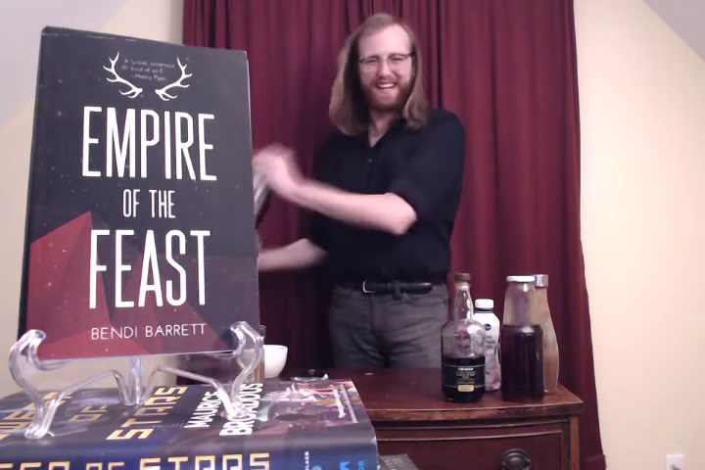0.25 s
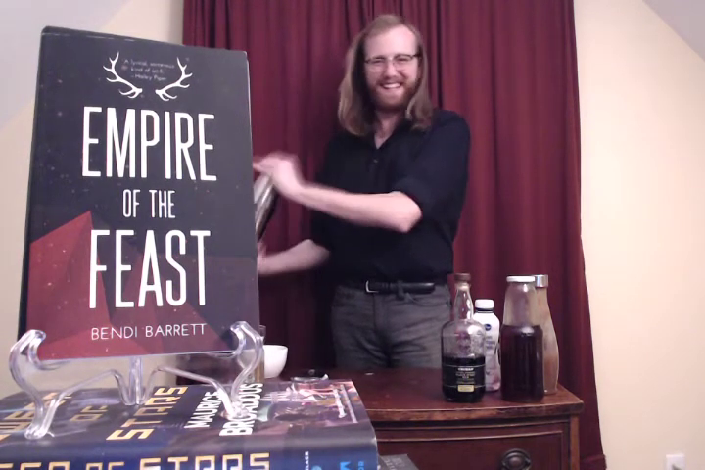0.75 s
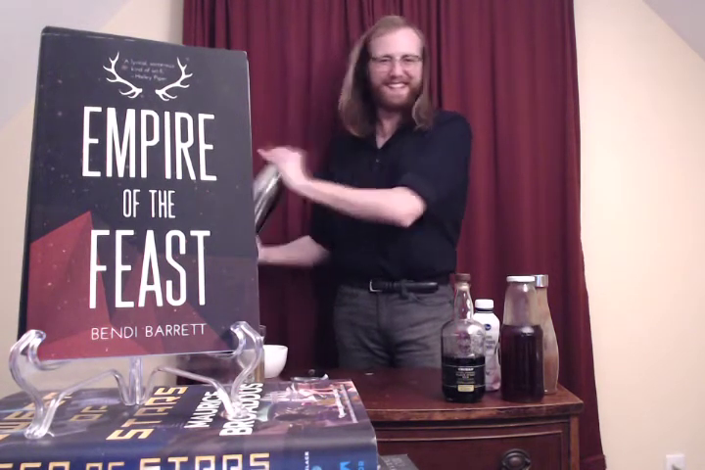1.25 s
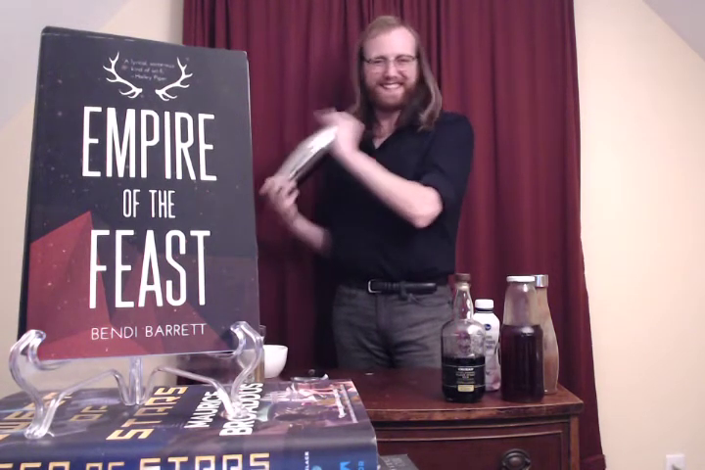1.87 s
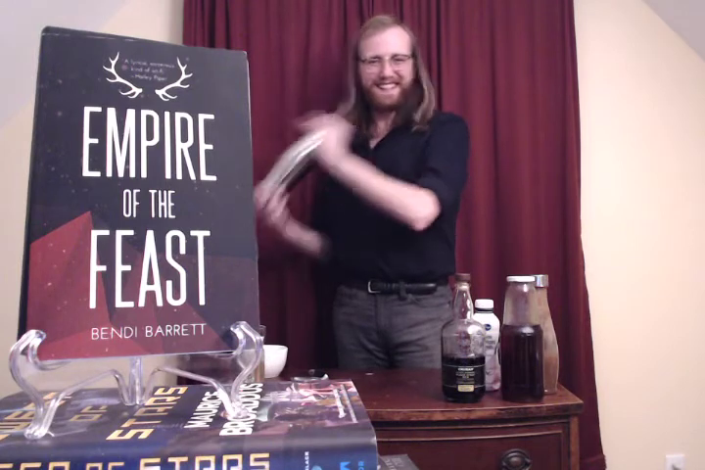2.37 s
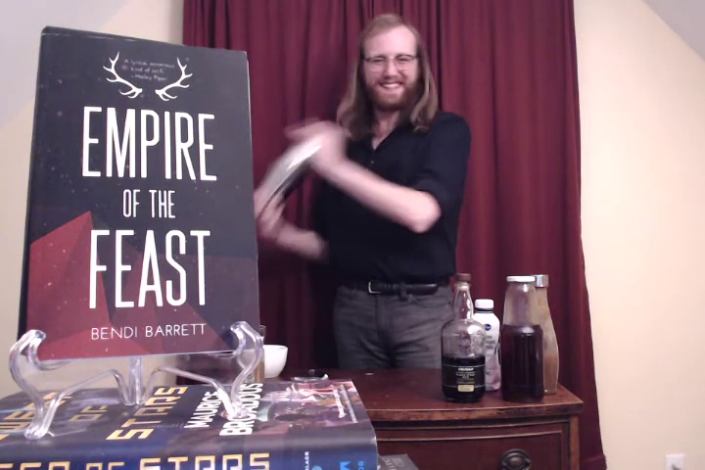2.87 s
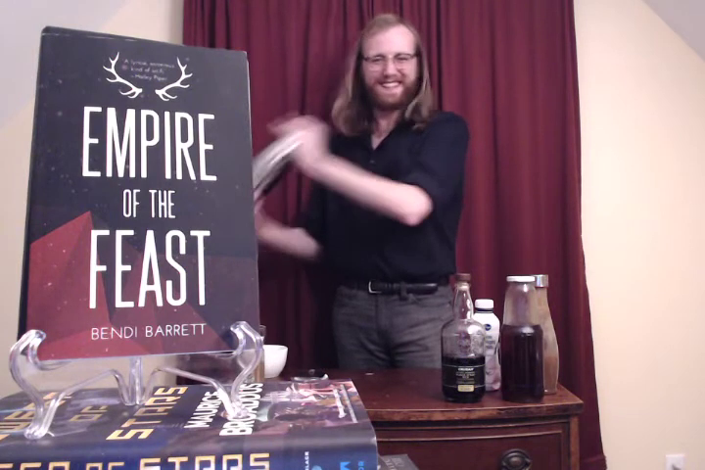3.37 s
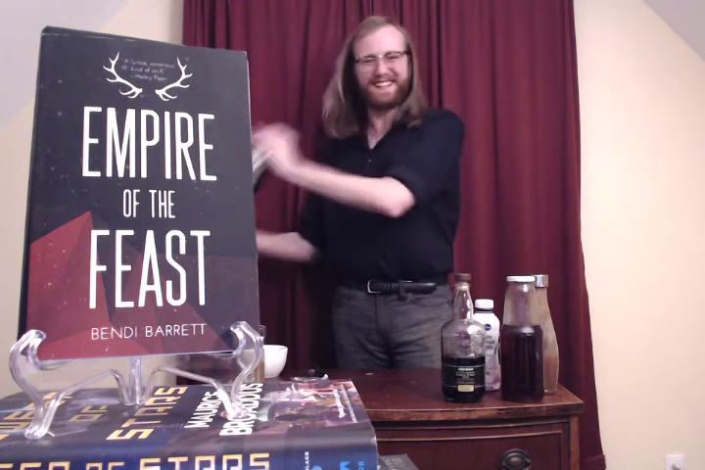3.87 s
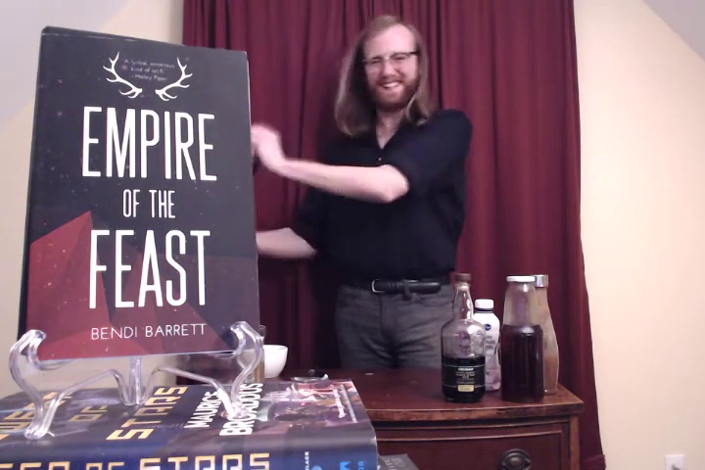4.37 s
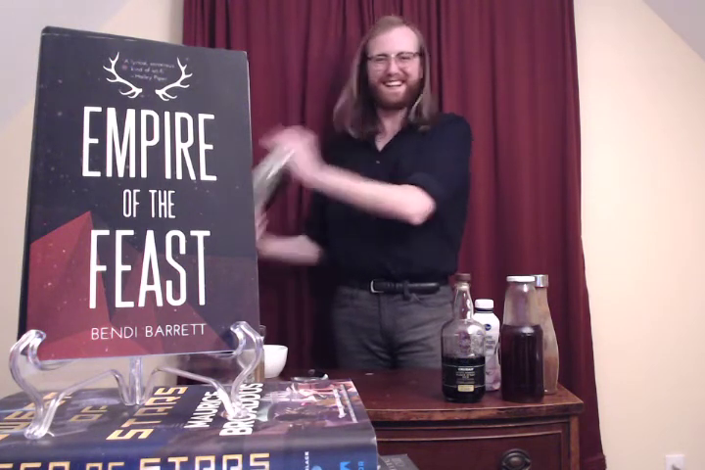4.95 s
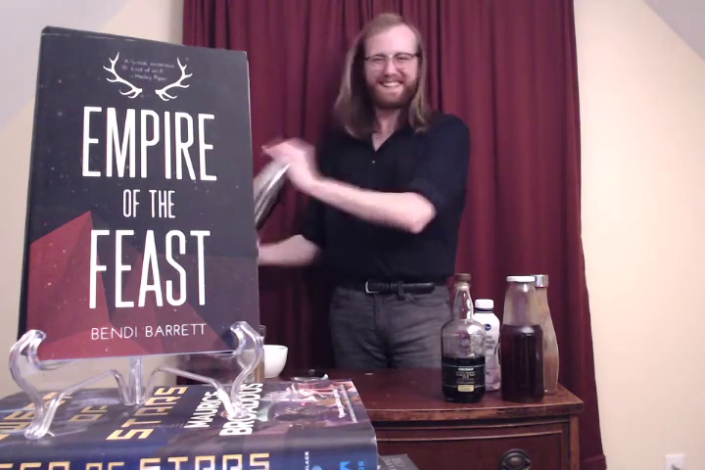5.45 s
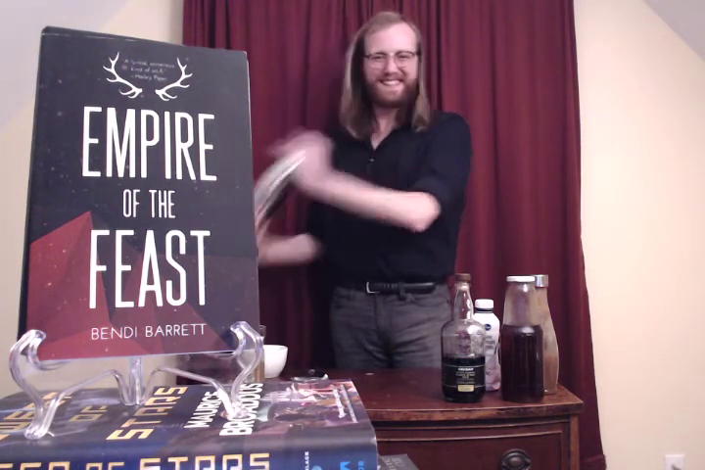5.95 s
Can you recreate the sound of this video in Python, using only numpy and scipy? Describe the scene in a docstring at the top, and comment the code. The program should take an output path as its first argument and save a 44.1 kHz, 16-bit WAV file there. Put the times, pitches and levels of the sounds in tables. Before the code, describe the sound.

A metal shaker full of ice rattles rapidly without pause, nearly eight strokes a second, with sharp cracks, clinks and fine sloshing.

```python
"""Cocktail shaker, hard shake

Ice and liquid are shaken hard in a steel cocktail shaker, nearly eight strokes a second, in a small curtained room.
On each stroke the cubes skitter along the wall as random taps, then crash into the end and ring the tin's modes.
Single cubes crack as noise bursts and clink as damped notes; low thuds mark the load landing flat on the base.
The drink sloshes between the strokes as fine, fading collisions, over faint filtered noise for the room's air."""
import sys
import numpy as np
from scipy import signal
from scipy.fft import rfft, irfft
from scipy.io import wavfile
from scipy.ndimage import uniform_filter1d

SR = 44100
rng = np.random.default_rng(int(sys.argv[2]) if len(sys.argv) > 2 else 0)


def transcribe(u):
    """Save the signal u as a 16-bit wav file named by the first command-line argument.

    u: samples, shape (n,) or (channels, n), limited to [-1, 1]; the rate is SR.
    q: integer samples, one column per channel.
    """
    v = np.clip(np.atleast_2d(u).T, -1, 1)
    q = np.round(v * 32767).astype(np.int16)
    wavfile.write(sys.argv[1], SR, q)


N = 273593
STROKE_SIZE = 13230  # samples in one stroke's sound, 0.3 s


def undb(db):
    """Decibels to gain."""
    return 10 ** (np.asarray(db) / 20)


def add(out, start_s, x):
    """Mix x into out from the given time on, dropping what falls outside."""
    start = int(start_s * SR)
    x = x[max(-start, 0):max(len(out) - start, 0)]
    first = max(start, 0)
    out[first:first + len(x)] += x


def unit(x):
    """Scale to an energy of one."""
    return x / np.sqrt(np.sum(x ** 2) + 1e-18)


def through(x, response):
    """Convolve and keep the length."""
    return signal.fftconvolve(x, response)[:len(x)]


def colour(points, size=4096):
    """Causal, minimum-phase impulse response of a (pitch_hz, level_db) spectrum."""
    hz, db = np.transpose(points)
    grid = np.maximum(np.arange(size // 2 + 1) * SR / size, 1)
    spectrum_db = np.interp(np.log(grid), np.log(hz), db)
    cepstrum = irfft(np.log(undb(spectrum_db)))
    # folding the cepstrum forward in time makes the response causal
    cepstrum[1:size // 2] *= 2
    cepstrum[size // 2 + 1:] = 0
    return irfft(np.exp(rfft(cepstrum)))


def mode(hz, t60):
    """A sine that fades by 60 dB in t60 seconds."""
    t = np.arange(STROKE_SIZE) / SR
    return np.sin(2 * np.pi * hz * t) * np.exp(-np.log(1000) * t / t60)


# spectrum of the room's still air: pitch_hz [Hz], level_db [dB, relative]
AIR_SPECTRUM = [(15, 3), (25, -1), (42, -11), (90, -12.5), (200, -17), (1000, -8), (15000, -40)]
AIR_DB = -51.5  # RMS level


def room_air():
    """Steady noise, heaviest in the lows, for the still air of the room."""
    return undb(AIR_DB) * through(rng.standard_normal(N), unit(colour(AIR_SPECTRUM)))


ROOM_DB, ROOM_T60_S = 1, 0.12  # tail against direct sound for the hits; decay time


def room(x, wet_db):
    """Direct sound and a diffuse tail; the moving shaker keeps the echoes from settling into a pattern."""
    t = np.arange(STROKE_SIZE) / SR
    fade = unit(np.exp(-np.log(1000) * t / ROOM_T60_S))
    tail_power = np.abs(through(x ** 2, fade ** 2))
    tail = rng.standard_normal(len(x)) * np.sqrt(tail_power)
    return (x + undb(wet_db) * tail) / np.sqrt(1 + undb(2 * wet_db))


# colour of ice on wet steel: pitch_hz [Hz], level_db [dB, relative]
ICE_COLOUR = [(40, -27), (100, -21), (155, -17.5), (200, -7.5), (420, -7), (560, -5.5), (1300, 1.5),
              (1680, -3.5), (2200, 1.5), (3600, -1), (7600, 1), (9400, -5), (11600, -7), (15500, -16)]
# broad resonances of the filled shaker: pitch_hz [Hz], width_hz [Hz], level_db [dB over the plain rattle]
BODY_RESONANCES = [(200, 24, -3.5), (282, 20, -5.5), (358, 31, -8), (460, 14, -38), (565, 99, 2.5),
                   (733, 45, 2), (927, 23, -0.5), (1027, 140, -3.5), (1470, 290, -7.5), (1925, 450, -4.5),
                   (2660, 57, -22), (2817, 240, 0.5), (3064, 33, 2), (4370, 390, -1)]


def shaker_body():
    """Response of the filled shaker to one tap of ice: the tap plus the resonances it excites."""
    tap = colour(ICE_COLOUR)
    response = tap.copy()
    for hz, width_hz, level_db in BODY_RESONANCES:
        b, a = signal.iirpeak(hz, hz / width_hz, fs=SR)
        response += undb(level_db) * signal.lfilter(b, a, tap)
    return unit(response)


def tone(x, bass_db, treble_db):
    """A flat landing of the whole load is fuller; glancing corners are brighter."""
    curve = [(90, 0), (190, bass_db), (480, bass_db), (950, 0), (3500, 0), (7000, treble_db)]
    return through(x, colour(curve))


def collisions(size, rate, spread_db, even_s):
    """Random clicks (rate per s), many small and a few large, with a power of about one over even_s."""
    sizes = undb(spread_db * np.minimum(rng.exponential(size=size), 2 * np.pi))
    x = (rng.random(size) < rate / SR) * rng.choice([-1, 1], size) * sizes
    power = np.abs(uniform_filter1d(x ** 2, int(even_s * SR) + 1))
    return x / np.sqrt(power + 1e-9)


SLOSH_DB, SLOSH_SETTLE_DB_PER_S = -33, 56  # level before shaker tone; fade after each crash


def slosh(body):
    """Each crash stirs up froth and loose chips, which settle until the next one."""
    t = np.arange(N) / SR
    crashes = np.array(STROKES)[:, 1]
    latest = np.maximum(np.searchsorted(crashes, t) - 1, 0)
    since_crash = t - crashes[latest]
    chips = room(collisions(N, rate=1800, spread_db=3.2, even_s=.03), wet_db=4)
    wet_rattle = through(tone(chips, bass_db=-3.5, treble_db=-1.5), body)
    return undb(SLOSH_DB - SLOSH_SETTLE_DB_PER_S * since_crash) * wet_rattle


THUD_SWELL_S = 0.0035


def thud(hz):
    """The whole load lands flat on the base: a low, quickly damped push."""
    t = np.arange(STROKE_SIZE) / SR
    return mode(hz, t60=0.027) * (1 - np.exp(-t / THUD_SWELL_S))


# flat landings on the base: start_s [s], pitch_hz [Hz], level_db [dB, before swell and fade]
THUDS = [(0.235, 215, -17), (0.364, 280, -11.5), (0.468, 240, -31), (2.026, 160, -25), (2.438, 240, -16),
         (4.929, 180, -27)]


def thuds():
    """Occasional low thuds of the load against the base."""
    out = np.zeros(N)
    for start_s, pitch_hz, level_db in THUDS:
        add(out, start_s, undb(level_db) * thud(pitch_hz))
    return out


def clink(hz):
    """A quickly damped note that swells for a moment as the cube chatters on the wall."""
    t = np.arange(STROKE_SIZE) / SR
    return mode(hz, t60=.08) * (1 - np.exp(-t / .0015))


# blows that leave a short note: start_s [s], pitch_hz [Hz], level_db [dB, before swell and fade]
CLINKS = [(0.135, 1335, -17), (0.138, 2060, -11), (0.236, 4650, -14), (1.423, 2239, -18),
          (1.924, 2067, -12), (2.452, 1378, -15), (2.692, 3186, -12), (4.517, 3050, -16),
          (4.550, 2067, -16), (4.667, 2024, -12), (4.815, 4000, -20), (4.922, 2842, -17),
          (5.481, 2670, -15)]


def clinks():
    """Single cubes that strike a short note."""
    out = np.zeros(N)
    for start_s, pitch_hz, level_db in CLINKS:
        add(out, start_s, undb(level_db) * clink(pitch_hz))
    return out


def noise_burst(decay_s):
    """A short burst of noise with a soft onset and a random colour, which shapes a cube's taps or a single crack."""
    age = np.arange(STROKE_SIZE // 20) / SR / decay_s
    return unit(rng.standard_normal(len(age)) * np.sqrt(age) * np.exp(-age))


CRACK_TREBLE_DB = -4


def crack(body, bass_db):
    """One hard contact that splinters for a few milliseconds; peak one."""
    contact = noise_burst(decay_s=.0017)
    x = through(tone(room(contact, ROOM_DB), bass_db, CRACK_TREBLE_DB), body)
    return x / np.abs(x).max()


# one cube hits the steel squarely: start_s [s], level_db [dB, peak], bass_db [dB]
CRACKS = [(.1238, -9, 0), (.1424, -7, -4), (.2346, -4, 4), (.3654, -5, 8), (.391, -8, 0), (.4654, -11, 9),
          (.7658, -6, -6), (1.1504, -10, -1), (1.2316, -15, 4), (1.4085, -9, 1), (1.4289, -6, -4),
          (1.6621, -7, -9), (1.7684, -4, -5), (1.9237, -3, -1), (2.0169, -4, 1), (2.0262, -2, 1),
          (2.175, -10, -1), (2.2895, -4, 0), (2.4387, -4, 4), (2.807, -6, -8), (3.055, -11, -4),
          (3.4491, -14, -8), (3.5915, -7, -4), (3.8255, -12, 3), (4.3796, -5, 0), (4.517, -12, -10),
          (4.6289, -10, 1), (4.6622, -6, -5), (5.0892, -11, -3), (5.1075, -8, -1), (5.4688, -5, -6),
          (5.6145, -13, -2)]


def cracks(body):
    """Single cubes cracking above the rattle."""
    out = np.zeros(N)
    for start_s, level_db, bass_db in CRACKS:
        add(out, start_s, undb(level_db) * crack(body, bass_db))
    return out


# the tin's bell modes before detuning and choking: pitch_hz [Hz], t60_s [s], level_db [dB, relative]
TIN_MODES = [(1829, .08, 0), (1847, .21, -8), (1885, .05, -5), (2140, .14, -25), (2790, .14, -24),
             (2930, .12, -23), (3230, .16, -25)]


def bell():
    """The tin's close pair of modes beats as it fades; the grip tightens and chokes it before the next stroke."""
    t = np.arange(STROKE_SIZE) / SR
    swell = 1 - np.exp(-(t / .006) ** 2)
    choke = np.exp(-(t / .12) ** 4)
    # liquid washing over the wall detunes each mode a little and makes the ring flutter
    load = 1 + .004 * rng.standard_normal(len(TIN_MODES))
    knots = np.linspace(0, t[-1], 40)
    flutter = undb(2 * np.interp(t, knots, rng.standard_normal(len(knots))))
    ring = np.zeros(STROKE_SIZE)
    for (hz, t60_s, level_db), detune in zip(TIN_MODES, load):
        ring += undb(level_db) * mode(hz * detune, t60_s)
    return swell * choke * flutter * ring


def cubes(rate, spread_db, even_s, count=6):
    """Collisions of several cubes, each tap a burst of noise with a short clack."""
    taps = collisions(STROKE_SIZE, rate, spread_db, even_s)
    owner = rng.integers(count, size=STROKE_SIZE)
    out = np.zeros(STROKE_SIZE)
    # every cube meets its own patch of wall, which answers with a very short clack
    for k, hz in enumerate(1250 * 2 ** (2.5 * rng.random(count))):
        burst = noise_burst(decay_s=.0009)
        clack = unit(mode(hz, t60=.022)[:len(burst)])
        out += through(taps * (owner == k), burst + undb(-8) * clack)
    return out


COLOUR_SCATTER_DB = 2  # the load lies differently on each stroke


def reloaded(body, count=24):
    """The shaker's response with the ice lying another way: chance lifts some resonances and sinks others."""
    pitches_hz = np.geomspace(500, 14000, count)
    ripple_db = COLOUR_SCATTER_DB * rng.standard_normal(count)
    return unit(through(body, colour(list(zip(pitches_hz, ripple_db)))))


SKITTER_GROWTH_DB_PER_S = 29  # the cubes gather speed
CRASH_FADE_DB_PER_S = 725


def stroke(body, lead_s, crash_s, crash_db, skitter_db, bass_db, treble_db, ring_db):
    """The ice skitters down the wall, piles into the end and sets the tin ringing."""
    since_touch = np.arange(STROKE_SIZE) / SR
    t = since_touch - lead_s
    # a loose load takes longer to pile up than a compact one
    pile_up = np.clip(t / (.003 + .2 * crash_s) + .5, 0, 1)
    # the first cubes arrive one by one, and the skitter grows as they gather speed
    arrive = 1 - np.exp(-since_touch / .003)
    skitter = undb(skitter_db + SKITTER_GROWTH_DB_PER_S * np.minimum(t, 0)) * arrive * (1 - pile_up)
    crash = undb(crash_db - CRASH_FADE_DB_PER_S * np.maximum(t - crash_s, 0)) * pile_up
    hits = skitter * cubes(rate=700, spread_db=3.0, even_s=0.027)
    hits += crash * cubes(rate=1100, spread_db=1.5, even_s=0.0068)
    rattle = through(tone(room(hits, ROOM_DB), bass_db, treble_db), body)
    # the ring takes a share of the stroke's energy and starts as the load lands
    ring = undb(ring_db - 5.5) * np.sqrt(np.sum(rattle ** 2)) * unit(bell())
    add(rattle, lead_s, ring)
    return undb(-5.5) * rattle


# strokes, down and up by turns: touch_s [s, first touch], hit_s [s, crash],
# crash_db [dB, relative between strokes], ring_db [dB, tin ring relative to its stroke]
STROKES = [(-.03, -0.007, -7.5, -2.5), (0.088, 0.119, -16, -2), (0.205, 0.237, -13, -5),
           (0.339, 0.375, -8, -7), (0.457, 0.491, -7.5, -4.5), (.599, .626, -11.5, -9),
           (.714, 0.749, -12.5, -3), (0.853, 0.888, -11, 2.5), (0.966, 0.999, -9.5, -20),
           (1.104, 1.145, -15, -4.5), (1.23, 1.263, -14, -6), (1.37, 1.405, -13.5, -8.5),
           (1.478, 1.514, -12.5, 2), (1.633, 1.656, -16, 4.5), (1.731, 1.763, -11.5, 7.5),
           (1.885, 1.915, -18, 0), (1.982, 2.02, -14.5, 4.5), (2.125, 2.169, -14, -21),
           (2.251, 2.284, -13.5, -3), (2.389, 2.431, -16.5, -24), (2.502, 2.542, -9, 5),
           (2.648, 2.69, -13, -2), (2.776, 2.802, -12.5, 4), (2.917, 2.955, -16, -10),
           (3.045, 3.074, -11, -12), (3.164, 3.209, -16.5, -0.5), (3.3, 3.334, -11, -3.5),
           (3.453, 3.48, -14.5, -4), (3.549, 3.596, -9, 2), (3.692, 3.731, -15, 1), (3.82, 3.857, -16, 7),
           (3.952, 3.997, -14.5, -4), (4.077, 4.115, -11, -22), (4.224, 4.263, -16.5, -10),
           (4.335, 4.381, -12.5, -2.5), (4.499, 4.535, -15, 1), (4.624, 4.653, -15.5, -2),
           (4.767, 4.801, -16, -4.5), (4.893, 4.925, -13.5, -1), (5.047, 5.082, -22, -7),
           (5.183, 5.218, -17.5, -1.5), (5.317, 5.353, -16, -4), (5.436, 5.478, -15, -3.5),
           (5.583, 5.611, -20.5, 0), (5.718, 5.751, -17, -14), (5.869, 5.909, -16, -18),
           (5.975, 6.014, -13.5, -6), (6.115, 6.169, -17.5, -20.5)]
# the down stroke, then the up stroke, at usual force and unworn ice:
# skitter_db [dB, relative as crash_db], bass_db [dB], treble_db [dB]
DIRECTIONS = [(-17.5, 3.5, -1.33), (-19.5, 0.5, -3)]
USUAL_CRASH_DB, USUAL_CRASH_S = -12.5, .014
CRASH_DOUBLES_DB = 4.5  # a crash this much softer is spread over twice the time
SKITTER_FOLLOW, BASS_FOLLOW = 0.47, -0.17  # dB of skitter and of bass for each dB of a harder crash
BASS_LOSS_DB_PER_S = 0.51  # the cubes wear down and land less heavily


def shaking(body):
    """Down and up strokes alternate; a harder one skitters louder, and its crash is briefer and thinner."""
    out = np.zeros(N)
    for k, (touch_s, hit_s, crash_db, ring_db) in enumerate(STROKES):
        skitter_db, bass_db, treble_db = DIRECTIONS[k % 2]
        force_db = crash_db - USUAL_CRASH_DB
        crash_s = USUAL_CRASH_S * 2 ** (-force_db / CRASH_DOUBLES_DB)
        skitter_db += SKITTER_FOLLOW * force_db
        bass_db += BASS_FOLLOW * force_db - BASS_LOSS_DB_PER_S * hit_s
        sound = stroke(reloaded(body), hit_s - touch_s, crash_s, crash_db,
                       skitter_db, bass_db, treble_db, ring_db)
        add(out, touch_s, sound)
    return out


def scene():
    """The quiet room, the drink, single blows and the strokes."""
    body = shaker_body()
    out = room_air() + slosh(body)
    out += thuds() + clinks() + cracks(body)
    out += shaking(body)
    return out[None]


TOP_HZ = 15750


def record(dry):
    """The very highest peaks are softly rounded, and the microphone loses the top."""
    rounded = dry / (1 + (dry / .75) ** 6) ** (1 / 6)
    lowpass = signal.ellip(10, .2, 60, TOP_HZ, fs=SR, output="sos")
    return signal.sosfilt(lowpass, rounded)


dry = scene()
out = record(dry)
transcribe(out)
```